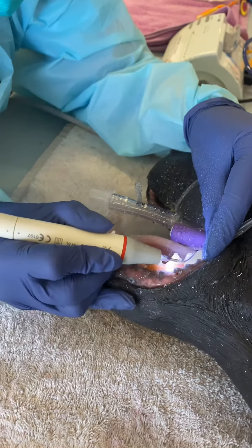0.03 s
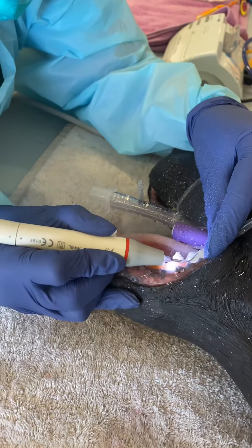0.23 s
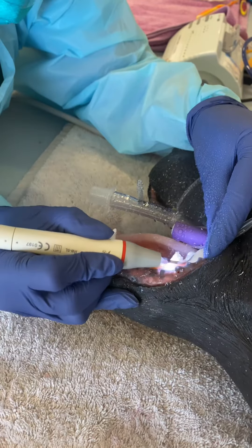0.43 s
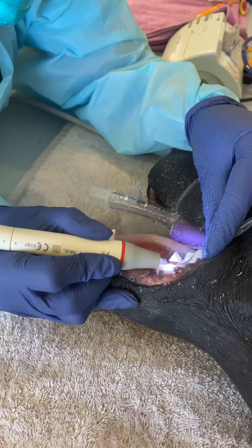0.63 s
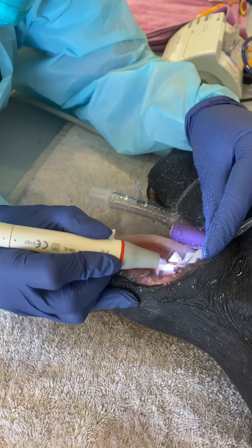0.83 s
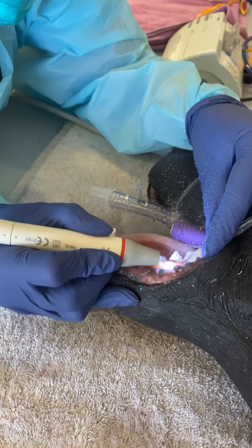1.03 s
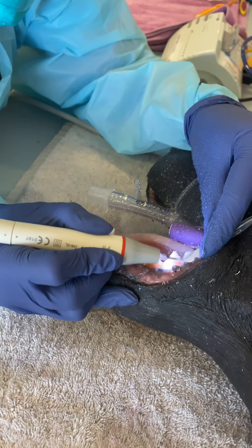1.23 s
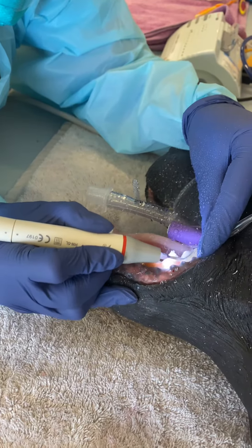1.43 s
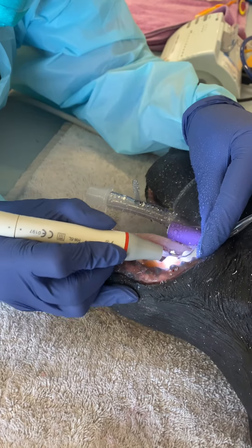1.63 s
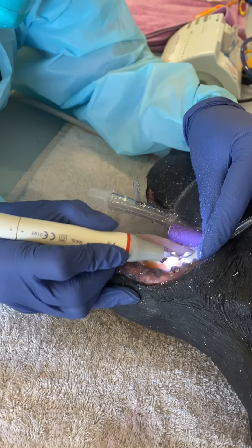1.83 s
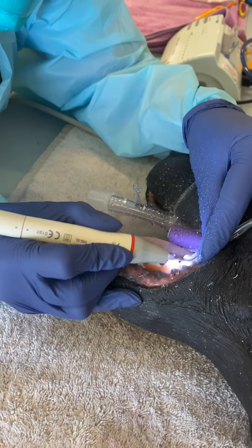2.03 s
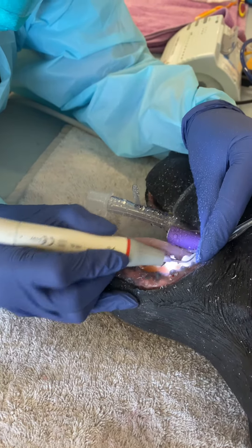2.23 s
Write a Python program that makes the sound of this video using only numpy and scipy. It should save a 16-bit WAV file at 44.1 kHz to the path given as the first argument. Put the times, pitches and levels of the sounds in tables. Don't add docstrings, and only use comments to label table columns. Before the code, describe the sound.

Dental cleaning tool chirps shrilly and buzzes harshly against an animal's teeth, with sputtering water spray

```python
import sys
import numpy as np
from scipy import signal
from scipy.fft import rfft, irfft, next_fast_len
from scipy.io import wavfile
from scipy.ndimage import uniform_filter1d, map_coordinates

SR = 44100
rng = np.random.default_rng(int(sys.argv[2]) if len(sys.argv) > 2 else 0)


def field_ratio(decibels):
    return 10 ** (np.asarray(decibels, dtype=float) / 20)


def dump(signal):
    limited = np.clip(np.atleast_2d(signal).T, -1, 1)
    pcm = np.round(limited * 32767).astype(np.int16)
    wavfile.write(sys.argv[1], SR, pcm)


N = 101429
TIME = np.arange(N) / SR
TIP_HZ = 28368


def unit(x):
    return x / np.sqrt(np.mean(x ** 2) + 1e-20)


def along(points, hz):
    f, value = np.transpose(points)
    return np.interp(np.log(hz + 1), np.log(f + 1), value)


def wobble(rate):
    points = rng.standard_normal(int(N * rate / SR) + 4)
    return map_coordinates(points, [np.arange(N) * rate / SR])


def filtered(x, response):
    m = next_fast_len(N + 8192)
    return irfft(rfft(x, m) * response(np.fft.rfftfreq(m, 1 / SR)), m)[..., :N]


def peak(hz, center, width):
    return 1j * hz * width / (center * center - hz * hz + 1j * hz * width)


def hiss(spectrum, patchy_db, channels=2):
    z = signal.stft(rng.standard_normal((channels, N)), nperseg=256)[2]
    field = rng.standard_normal(z.shape[1:])
    field = uniform_filter1d(field, size=4, axis=0)
    field = uniform_filter1d(field, size=8, axis=1)
    x = signal.istft(z * field_ratio(patchy_db * unit(field)), nperseg=256)[1][:, :N]
    return unit(filtered(x, lambda hz: field_ratio(along(spectrum, hz) - 100 * (hz > 16300))))


def ports(x, alike=None):
    # (f/Hz, lead/rad)
    lead = [(1500, 0), (3000, .9), (3800, 2.3), (4500, 3.1), (5900, 7), (9500, 8.2), (12600, 9.25),
            (14200, 9.08), (15200, 9.45), (16000, 9.6)]
    # (f/Hz, level/dB)
    tilt = [(1500, -1), (2100, -3), (2900, -7.5), (3800, -7), (4700, -1.5), (9000, 0.5)]

    def response(hz):
        side = np.array([[1], [-1]])
        return field_ratio(side * along(tilt, hz) / 2) * np.exp(0.5j * side * along(lead, hz))

    def mix(hz):
        turn = np.arccos(np.clip(along(alike, hz), -1, 1)) / 2
        return np.array([np.cos(turn), np.sin(turn)])

    if alike is not None:
        same, opposite = filtered(x, mix)
        x = np.array([same + opposite, same - opposite])
    return filtered(x, response)


def contact(rows, extra_db=0):
    edge_s, release_s = 0.0018, 0.0022
    levels = np.array([r[2] for r in rows]) + extra_db
    total = 0
    for row, db in zip(rows, levels):
        rise = np.clip((TIME - row[0]) / edge_s, 0, 1)
        fall = np.exp(-np.maximum(TIME - row[0] - row[1], 0) / release_s * 2)
        total = total + field_ratio(db) * rise * fall
    return total


def whistle(hz, waver_db, slip):
    size = np.sqrt(2) * field_ratio(waver_db * wobble(300))
    return size * np.sin(2 * np.pi * hz * TIME + slip * wobble(160))


def knock(start_s, db, modes, attack_s, waver_hz):
    t = np.maximum(TIME - start_s, 0)
    ringing = 0
    for hz, mode_db, t60 in modes:
        tone = np.sin(2 * np.pi * hz * t + 1.4 * wobble(waver_hz))
        ringing = ringing + field_ratio(mode_db - 60 * t / t60) * tone
    return field_ratio(db) * (1 - np.exp(-t / attack_s)) * ringing


def mist():
    # (t/s, level/dB)
    flow = [
        (0, -37.5),
        (.2, -35),
        (.31, -42),
        (.43, -42.5),
        (0.881, -39),
        (1.38, -42),
        (1.9, -40.5),
        (2.115, -43),
        (2.128, -57),
        (2.3, -81),
    ]
    # (f/Hz, level/dB per Hz)
    spray = [(500, -19.5), (1400, -13.5), (2100, -2), (3500, -10), (4400, -1), (5300, -5.5), (9000, 2.5),
             (12500, 0.5), (16500, 0.5)]
    # (f/Hz, likeness 0-1)
    near = [(300, 0.25), (800, 0.34), (1500, 0.93), (3500, 0.93), (6000, 0.63), (9500, 0.99), (11300, 0.94),
            (13000, 0.97)]
    flow_db = np.interp(TIME, *np.transpose(flow))
    flow_db = flow_db + 1.1 * wobble(12) + 0.9 * wobble(150)
    drops = hiss(spray, patchy_db=2.5)
    drops = filtered(drops, lambda hz: 1 + field_ratio(7) * peak(hz, center=5280, width=330))
    return field_ratio(flow_db) * ports(drops, near)


def room_air():
    # (f/Hz, level/dB per Hz)
    air = [(35, -17), (60, -1.5), (200, -7.5), (400, -15.5), (800, -19), (3000, -21.5), (5500, -24),
           (9000, -25.5), (11000, -38), (13000, -62.5)]
    # (f/Hz, likeness 0-1)
    far = [(60, 1), (300, 1), (800, 0.17), (3000, 0.41), (6000, 0.47), (11000, 0.83)]
    return field_ratio(-60 + 0.54 * wobble(5)) * ports(hiss(air, patchy_db=2.0), far)


def room_hum():
    # (t/s, level/dB)
    swells = [(0, -51), (.28, -52.5), (.36, -70.5), (.6, -66.5), (.76, -51), (.82, -72), (1.3, -69.5),
              (1.55, -53), (1.65, -63), (1.72, -57.5), (1.829, -64), (1.9, -55.5), (2.0, -67), (2.101, -68)]
    level_db = np.interp(TIME, *np.transpose(swells)) + 1.3 * wobble(7.9)
    return field_ratio(level_db) * np.sin(2 * np.pi * 100.8 * TIME + 0.62 * wobble(8.9))


def unit_whine():
    # (f/Hz, level/dB)
    tones = [(5889, -77), (9453, -69)]
    return sum(field_ratio(db) * whistle(hz, waver_db=4.5, slip=0.6) for hz, db in tones)


def far_thud():
    # (f/Hz, level/dB, time to fall 60 dB/s)
    boom = [(134.2, 8, 0.17), (179.6, -6, 0.37), (102.7, -7, 0.5)]
    return knock(0.08, -25, boom, attack_s=0.034, waver_hz=30.47)


def half_whistles():
    # (t/s, length/s, level/dB)
    touches = [(.211, .011, -37), (.262, .008, -32), (.350, 0.016, -29), (.379, 0.017, -25),
               (.4, .011, -32), (.415, 0.0088, -43), (.444, .016, -35), (.461, .014, -27),
               (.549, 0.039, -29.5), (.597, 0.046, -40), (.648, 0.009, -28), (.669, 0.018, -22),
               (.897, 0.01, -47), (1.065, 0.037, -34), (1.242, .01, -32), (1.256, 0.0075, -40),
               (1.272, 0.023, -30), (1.312, .06, -42), (1.39, .11, -27.5), (1.535, 0.026, -32),
               (1.575, 0.0083, -28), (1.641, 0.027, -28), (1.688, 0.009, -28), (1.721, 0.0039, -27),
               (1.762, 0.014, -28), (1.846, 0.0076, -41), (1.974, .006, -31)]
    loudness = uniform_filter1d(contact(touches), size=60) * field_ratio(wobble(40))
    return loudness * whistle(TIP_HZ / 2, waver_db=2.5, slip=0.5)


def rattle():
    # (t/s, length/s, level/dB, bounce f/Hz, ring level/dB)
    bounces = [(0.221, 0.025, -27.5, 3004, 6), (.230, 0.022, -33, 3077, 16),
               (0.253, 0.018, -21.5, 2914, 1.5), (0.272, 0.015, -33, 3092, -12),
               (.355, 0.0071, -46.5, 3003, 15.5), (0.379, 0.013, -31, 2940, 1),
               (0.463, 0.012, -22, 2868, -2.5), (0.57, .008, -44, 3050, 6.5), (0.579, 0.0065, -35, 3082, 2),
               (0.653, 0.0037, -39.5, 3130, 9.5), (0.668, 0.016, -24, 2878, -1),
               (0.794, 0.018, -33.5, 3162, 0), (0.807, 0.015, -21.5, 3060, -4.5),
               (0.815, 0.019, -33, 3138, -1), (0.959, 0.011, -14.5, 2868, -1.5),
               (0.979, 0.0047, -29, 3066, 2), (1.168, 0.0093, -20.5, 3154, -3),
               (1.182, 0.0075, -27.5, 2882, 3), (1.274, 0.022, -24, 2906, -7),
               (1.309, 0.0033, -40, 3150, 1.5), (1.367, 0.0083, -33, 3163, 8),
               (1.513, 0.022, -25.5, 3147, -3), (1.541, 0.0051, -32.5, 3195, 6.5),
               (1.716, 0.0055, -35, 3000, 2.5), (1.907, 0.0098, -28.5, 3318, -2.5),
               (1.978, .025, -32, 2866, 8.5), (2.021, 0.0099, -24.5, 3160, -5.5),
               (2.042, 0.0067, -34.5, 3030, 2.5)]
    # (f/Hz, width/Hz, level/dB)
    tooth = [(2530, 320, 3.5), (3000, 860, 6), (5250, 600, -0.5), (8805, 480, 9), (11320, 260, 16),
             (14500, 880, -6.5)]
    ring_hz = (6117, 6230)
    drift, scatter, size_db, flutter_db, chaos = 0.046, 0.033, 6.0, 3, 0.14

    start, _, _, hz, ring_db = np.transpose(bounces)
    which = np.clip(np.searchsorted(start, TIME) - 1, 0, None)
    rate = hz[which]
    off_lock = np.minimum(abs(rate - TIP_HZ / 10), 4 * abs(rate - TIP_HZ / 9) + 40)
    loose = np.clip(off_lock / 150, 0.36, 1)

    turns = np.cumsum(rate * (1 + drift * loose * wobble(350))) / SR
    count = np.arange(1, 7600)
    time_luck, size_luck = rng.standard_normal((2, len(count)))
    free = np.interp(count, turns, loose)
    at = np.interp(count + scatter * free * time_luck, turns, np.arange(N))[:, None]

    k = np.floor(at) + np.arange(-7, 9)
    taps = np.sinc(k - at) * np.cos(np.pi * (k - at) / 16) ** 2
    taps = taps * field_ratio(size_db * free * size_luck)[:, None]
    blows = np.bincount(np.clip(k, 0, N - 1).astype(int).ravel(), taps.ravel(), N)

    def body(f):
        modes = sum(field_ratio(db) * peak(f, center, width) for center, width, db in tooth)
        return modes * f ** 2 / (f ** 2 + 1500 ** 2)

    def ring(f):
        return np.array([peak(f, center, 332) for center in ring_hz])

    fast = np.clip((rate - 3020) / (3150 - 3020), 0, 1)
    share = np.sqrt([1 - fast, fast])
    scrape = blows + chaos * np.std(blows) * rng.standard_normal(N)
    blows = blows * field_ratio(flutter_db * wobble(260))
    clatter = filtered(blows * contact(bounces), body) / np.std(filtered(blows, body))
    ringing = filtered(scrape * contact(bounces, ring_db) * share, ring).sum(axis=0)
    return clatter + ringing / np.std(filtered(scrape, ring))


def squeaks():
    # (t/s, length/s, level/dB, f/Hz)
    strays = [(1.432, 0.0075, -38.5, 6130), (1.245, 0.004, -34, 6200), (1.658, 0.013, -25, 10280),
              (1.45, .012, -44, 7200), (.232, .021, -29, 13600), (.23, .022, -35, 15000),
              (.255, .017, -27, 8100), (.655, .03, -40, 12400), (.96, .01, -28, 13750),
              (.98, .009, -30, 13800), (1.002, .012, -32, 12250), (1.077, .016, -33, 12900),
              (1.078, .014, -36, 15500), (1.985, .03, -40, 11100), (1.985, .014, -56, 930),
              (.841, .008, -37, 12100), (1.655, .016, -44, 3900), (1.695, .025, -43, 7100),
              (.235, .018, -30, 7500)]
    return sum(contact([r]) * whistle(r[3], waver_db=1.5, slip=0.4) for r in strays)


def third_whistles():
    # (t/s, length/s, level/dB, grit over whistle/dB)
    touches = [(0.268, 0.039, -30.5, -10.5), (0.361, 0.022, -31.5, -17), (0.469, 0.023, -30, -15.5),
               (0.584, 0.0063, -34.5, 6.5), (0.77, 0.039, -24.5, -10), (0.815, 0.022, -27, -7.5),
               (0.984, 0.0039, -18.5, -7.5), (1.147, 0.007, -30, -7), (1.166, 0.017, -22.5, -7),
               (1.184, 0.026, -22, -28), (1.367, .010, -25.5, -3.5), (1.41, 0.013, -43, 2),
               (1.499, 0.025, -23, -9.5), (1.526, 0.0071, -27.5, 4), (1.539, 0.0082, -23, -4),
               (1.581, 0.0094, -20, -18), (1.693, 0.027, -19.5, -16), (1.77, 0.012, -18, -24),
               (1.771, 0.0041, -40.5, 13.5), (1.716, 0.0052, -48, 6), (1.904, 0.0052, -31.5, 9),
               (1.976, 0.048, -20, -10.5), (2.02, 0.015, -26, 2.5), (2.034, 0.014, -24, -1)]
    # (f/Hz, level/dB per Hz)
    scraping = [(1500, -35), (3000, -5.5), (4200, -8), (5300, -4), (8500, -4.5), (10500, -3), (13000, -16),
                (16500, -13)]
    tone = contact(touches) * whistle(TIP_HZ / 3, waver_db=2.5, slip=0.34)
    grit = hiss(scraping, patchy_db=5.5, channels=1)[0] * field_ratio(5.5 * wobble(400))
    return tone + grit * contact(touches, [r[3] for r in touches])


def pedal_click():
    # (f/Hz, level/dB, time to fall 60 dB/s)
    case = [(222, -11, 0.21), (318, -1, 0.1), (487, 1, 0.12), (678, 3, 0.047)]
    return knock(2.143, -41.5, case, attack_s=0.0042, waver_hz=89.7)


def walls(x):
    t60, dull_hz = 0.089, 6000
    t = np.arange(SR // 4) / SR
    tail = rng.standard_normal((2, len(t))) * field_ratio(-60 * t / t60)
    echo = signal.fftconvolve(x[None], tail / np.linalg.norm(tail[0]), axes=1)[:, :N]
    return filtered(echo, lambda hz: 1 / (1 + (hz / dull_hz) ** 4))


def scene():
    tool = unit_whine() + half_whistles() + rattle() + squeaks() + third_whistles()
    room = room_air() + room_hum() + far_thud() + pedal_click()
    return ports(tool) + field_ratio(-28) * walls(tool) + mist() + room


def roll_off(x):
    return signal.sosfilt(signal.butter(12, 16470, fs=SR, output="sos"), x)


def record(dry):
    ceiling, top_hz = 0.66, 15950
    envelope = abs(signal.hilbert(dry, next_fast_len(N))[:, :N]).max(axis=0)
    size = uniform_filter1d(envelope, size=24)
    held = dry / (1 + (size / ceiling) ** 4) ** 0.25
    mix = filtered(held, lambda hz: np.clip((top_hz - hz) / 250, 0, 1) ** 2)
    return roll_off(mix)


dry = scene()
out = record(dry)
dump(out)
```